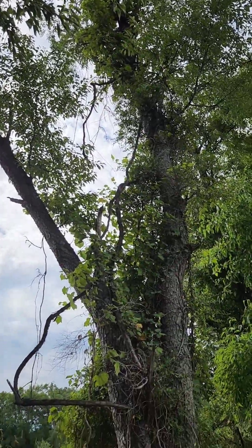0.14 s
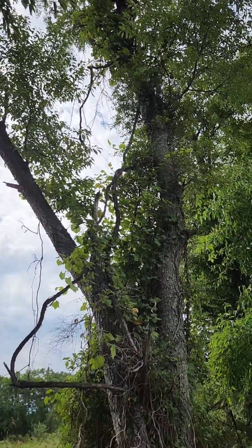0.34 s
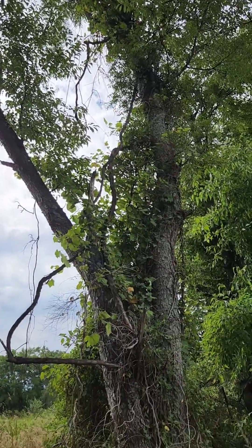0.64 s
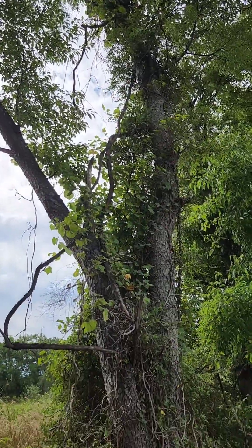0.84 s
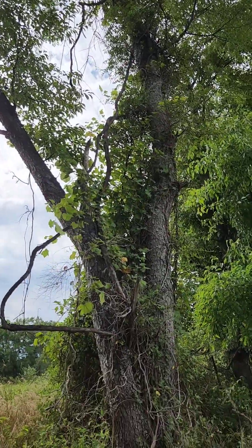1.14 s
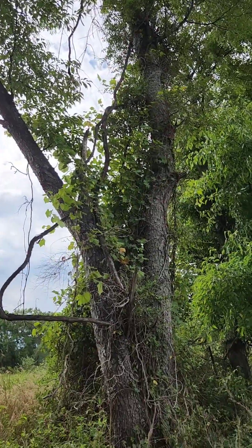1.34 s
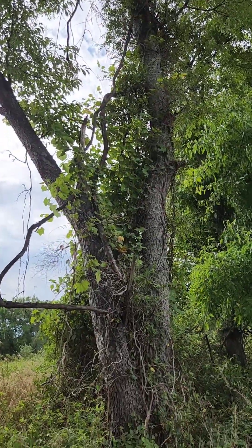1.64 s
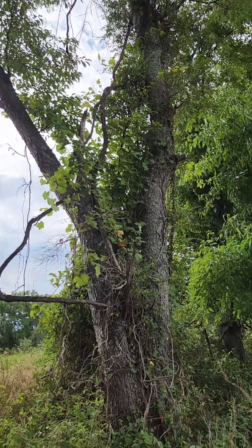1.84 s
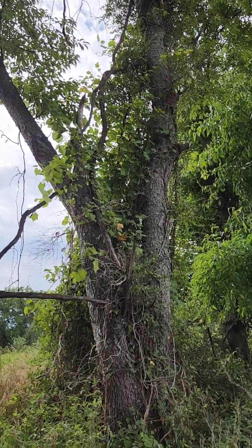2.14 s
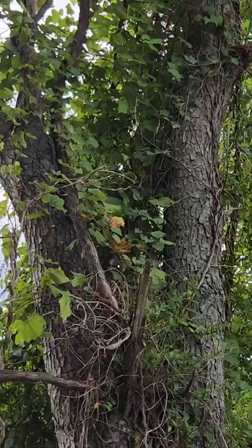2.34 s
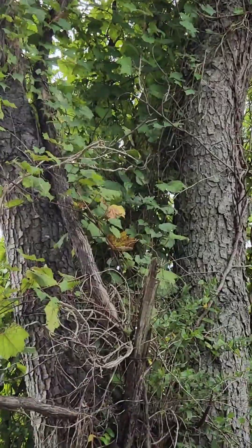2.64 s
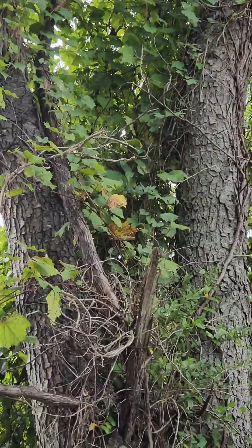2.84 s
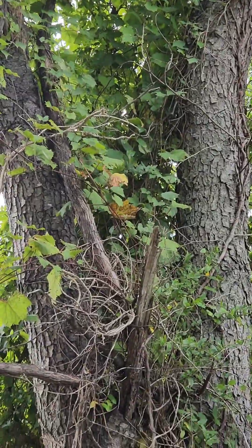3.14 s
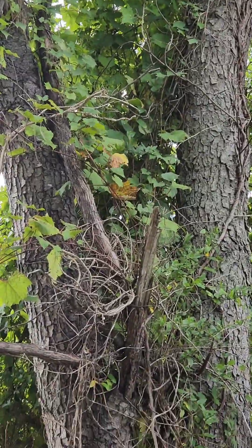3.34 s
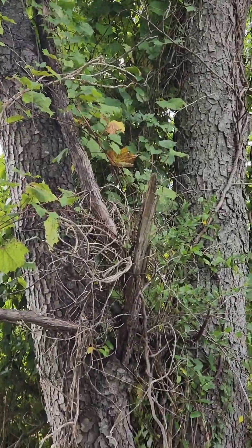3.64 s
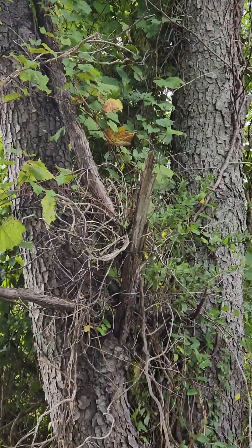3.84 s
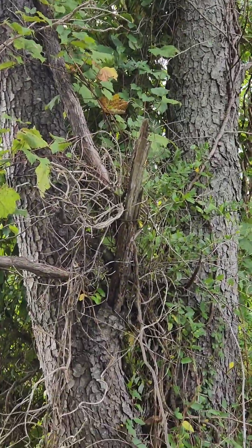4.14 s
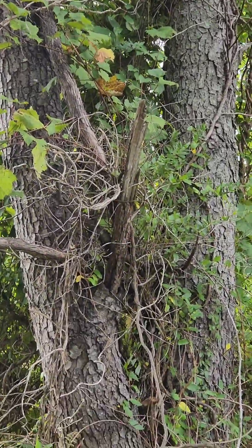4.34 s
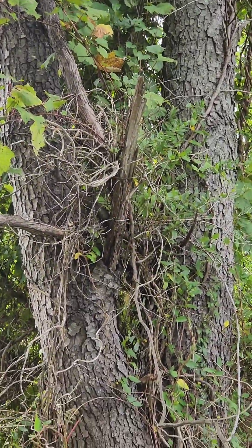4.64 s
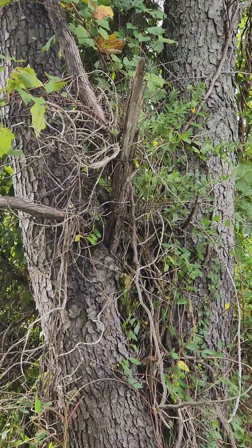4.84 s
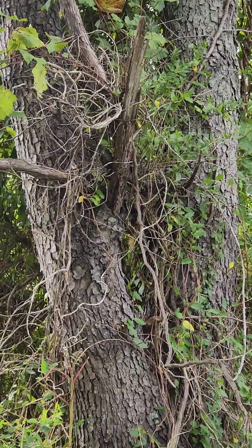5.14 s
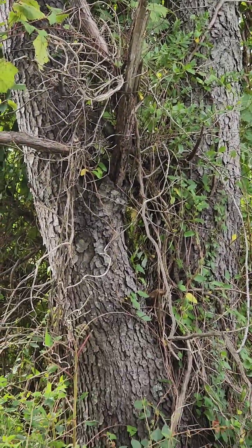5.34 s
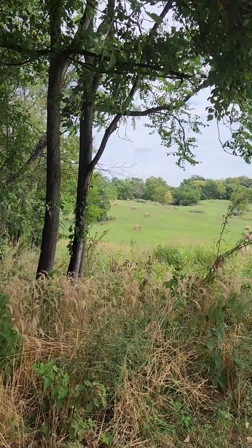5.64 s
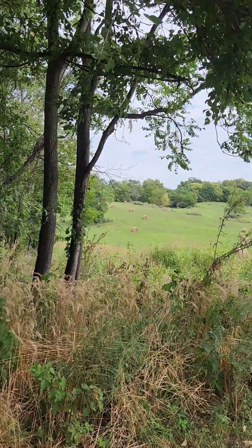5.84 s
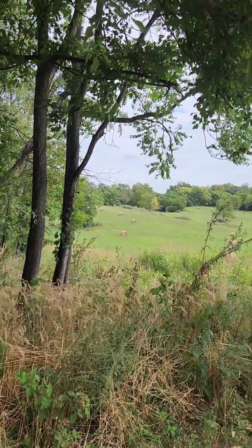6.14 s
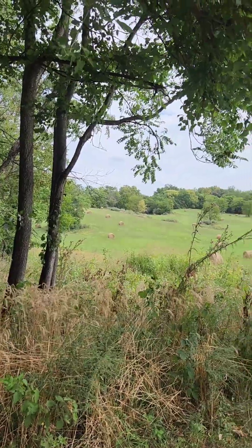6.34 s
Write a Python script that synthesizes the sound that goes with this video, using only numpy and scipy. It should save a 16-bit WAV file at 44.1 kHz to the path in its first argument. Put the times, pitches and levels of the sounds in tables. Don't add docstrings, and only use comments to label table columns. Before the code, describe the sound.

Summer field edge: continuous high insect trilling, soft triple chirps growing nearer, wind thumping the microphone, a short dead gap, then a close pulsing cricket.

```python
import sys
import numpy as np
from scipy import signal
from scipy.fft import rfft, irfft, next_fast_len
from scipy.io import wavfile
from scipy.ndimage import map_coordinates

SR = 44100
rng = np.random.default_rng(int(sys.argv[2]) if len(sys.argv) > 2 else 0)


def log_audio(samples):
    frames = np.atleast_2d(samples).T
    limited = np.clip(frames, -1, 1)
    pcm = np.round(limited * 32767).astype(np.int16)
    wavfile.write(sys.argv[1], SR, pcm)


def nominal_scale(level):
    x = np.asarray(level, float) / 20
    return 10 ** x


N = 286650
STOP_S = 5.3825


def in_time(parts):
    t = np.arange(N) / SR
    first_end, second_start = parts[0][-1][0], parts[1][0][0]
    held = np.where(t < STOP_S, np.minimum(t, first_end), np.maximum(t, second_start))
    s, *columns = np.transpose([row for part in parts for row in part])
    return [np.interp(held, s, c) for c in columns]


def swells(rows, width_s):
    coarse = np.arange(0, N + 64, 64)
    s, *columns = np.transpose(rows)
    bells = np.exp(-((coarse / SR - s[:, None]) / width_s) ** 2)
    return [np.interp(np.arange(N), coarse, c @ bells) for c in columns]


def at_hz(points, hz):
    points = np.array(points)
    return np.interp(np.log(hz), np.log(points[:, 0]), points[:, 1])


def rms_one(x):
    return x / np.sqrt(np.mean(x ** 2) + 1e-20)


def pan(db):
    return nominal_scale(np.array([db / 2, -db / 2]))


def drift(rate):
    r = np.exp(-80 * np.pi * rate / SR)
    draws = rng.standard_normal(N // 40 + 2002)
    slow = signal.lfilter([1], [1, -2 * r, r * r], draws)[2000:]
    return np.interp(np.arange(N) / 40, np.arange(len(slow)), rms_one(slow))


def noise(colour, patchy_db, rate, count):
    # (frequency [Hz], likeness [-1 to 1])
    likeness = [(60, .7), (150, .5), (300, .85), (700, .8), (1400, .68), (2600, .3), (4400, -.2), (6000, 0)]
    size = next_fast_len(N)
    hz = np.maximum(np.fft.rfftfreq(size, 1 / SR), 1)
    alike = np.clip(at_hz(likeness, hz), -1, 1)
    mid, side = rfft(rng.standard_normal((2, size))) * nominal_scale(at_hz(colour, hz))
    both = np.sqrt(1 + alike) * mid + np.sqrt(1 - alike) * side * [[1], [-1]]
    place = np.interp(np.log(hz), np.log([colour[0][0], colour[-1][0]]), [-1, count])
    out, together = 0, drift(rate)
    for k in range(count):
        band = irfft(both * np.maximum(1 - abs(place - k), 0), size)[:, :N]
        flicker_db = patchy_db * (0.63 * together + 0.61 * drift(rate))
        out = out + band * nominal_scale(flicker_db)
    return rms_one(out)


def across_ports(x):
    # (time [s], left port hears later by [ms])
    facing = [
        [(0, .18), (.7, .14), (2.2, .1), (2.6, 0), (5.37, -.02)],
        [(5.6, -.07), (6.5, -.14)],
    ]
    late = in_time(facing)[0] * SR / 1000
    left = map_coordinates(x[0], [np.arange(N) - late], order=3, mode="nearest")
    return np.array([left, x[1]])


def add_stroke(out, s, db, hz, pan_db, length_s, rise_hz, fall_hz, third_db, paths):
    u = np.arange(int(length_s * SR)) / (length_s * SR)
    pitch_hz = hz - rise_hz * (1 - u) ** 3 - fall_hz * u ** 2.56
    phase = 2 * np.pi * np.cumsum(pitch_hz) / SR
    phase = phase + 2 * np.pi * paths[:, None]
    tone = np.sin(phase) + nominal_scale(third_db) * np.sin(3 * phase)
    stroke = np.sin(np.pi * u) ** .7 * tone
    i = int(np.clip(round(s * SR), 0, N))
    out[:, i:i + len(u)] += (nominal_scale(db) * pan(pan_db)[:, None] * stroke)[:, :N - i]


def trill(out, start, end, hz, rate, db, pan_db, wobble_db):
    times = np.arange(start, min(end, N / SR), 1 / rate)
    length_s = min(0.72 / rate, .022)
    lag = rng.random()
    for s, (late, loud, start_phase, sway) in zip(times, rng.standard_normal((400, 4))):
        paths = start_phase + np.array([0, lag + 0.24 * sway])
        add_stroke(out, s + .0012 * abs(late), db + wobble_db * loud, hz, pan_db, length_s, 150, 150, -80, paths)


def ground_crickets():
    # (time [s], level [dB], left over right [dB])
    chorus = [
        [(0, -31.5, -5.5), (.52, -34, -4), (1.85, -32, -6), (1.99, -35, -8), (2.5, -31, -6), (3.56, -32, -6.5),
         (3.9, -31.5, -7), (5.37, -32.5, -7)],
        [(5.6, -32, -5.5), (6.5, -34, -7.5)],
    ]
    # (frequency [Hz], level [dB per Hz])
    chorus_colour = [(5500, -45), (6300, -35.5), (6800, -18), (7100, -13.5), (7300, -4), (7750, -6.5),
                     (8050, -9), (8300, -20.5), (8750, -13.5), (8950, -21), (9200, -59)]
    # (frequency [Hz], level [dB per Hz])
    octave_colour = [(13900, -19), (14350, 1.5), (14600, 1.5), (15000, -5.5), (15700, -7.5), (16200, -23)]
    # (from [s], to [s], wing pitch [Hz], strokes per second [Hz], peak [dB], left over right [dB])
    singers = [
        (0, 2.7, 8780, 31.1, -57, 0),
        (2.7, 5.4, 8800, 18.4, -57, 1),
        (0, 5.4, 8410, 28.3, -49, -1),
        (0, 5.4, 7800, 47.2, -35, -9),
        (0, 5.4, 7560, 44.5, -39, -7),
        (0, 5.4, 7410, 13.4, -35, -5),
        (2.0, 5.4, 8020, 28.4, -38, -6),
        (0, 5.4, 7280, 41.0, -39, -5),
        (5.5, 6.5, 8100, 30.8, -40, -8),
        (5.65, 6.5, 4760, 52.0, -56, -2),
    ]
    # (time [s], peak [dB])
    close = [(5.6214, -23), (5.6981, -21), (5.7715, -20.5), (5.8465, -23), (5.9192, -21), (5.9981, -21),
             (6.0725, -20.5), (6.1456, -23.5), (6.2184, -23.5), (6.2909, -22.5), (6.3726, -24),
             (6.441, -25)]
    level_db, pan_db = in_time(chorus)
    crowd, single = np.zeros((2, N)), np.zeros((2, N))
    for hz in np.linspace(6900, 8500, num=33):
        rate, side, loud = rng.random(3)
        db = at_hz(chorus_colour, hz) + 3 * loud
        trill(crowd, -rate / 9, 7, hz + 40, 13 + 40 * rate, db, 6 * side - 3, 1.3)
    echoes = noise(chorus_colour, patchy_db=0.5, rate=8, count=4)
    blur = nominal_scale(1.23) * rms_one(crowd) + nominal_scale(-2.5) * echoes
    shared = .3
    blur[0] = shared * blur[1] + np.sqrt(1 - shared ** 2) * blur[0]
    for row in singers:
        trill(single, *row, 2.5)
    for s, db in close:
        paths = rng.random() + np.array([0, .1])
        add_stroke(single, s - .003, db - 3.0, 7560, -11, .021, 300, 120, -80, paths)
    overtone = noise(octave_colour, patchy_db=5.0, rate=8, count=2)
    octave = nominal_scale(level_db - 28.5) * pan(-1.5)[:, None] * overtone
    return octave + nominal_scale(level_db - 3.0) * pan(pan_db) * across_ports(blur) + single


def field_crickets():
    # (wing pitch [Hz], opening stroke lower by [Hz], stroke gap [s], swell per stroke [dB], droop [Hz])
    wings = [
        (4440, 220, .042, 4.5, 370),
        (4450, 17, .046, 1.5, 555),
        (4660, 51, 0.037, 1.5, 280),
    ]
    # (time of last stroke [s], its peak [dB], strokes [count], left over right [dB])
    near_chirps = [
        [(2.582, -32.5, 3, -3.5), (3.026, -29.5, 2, -3.5), (4.226, -31, 3, -3.5)],
        [(.349, -44, 3, -12), (.664, -62, 3, -11), (.998, -54, 3, -6), (1.361, -52.5, 3, -5),
         (1.716, -53.5, 3, -6), (2.054, -51, 3, -3), (2.398, -47, 3, -4), (2.748, -46.5, 3, -2),
         (3.224, -46, 3, -4.5), (3.546, -44, 3, -5), (3.976, -42, 3, -3), (4.314, -41, 2, -6),
         (4.675, -40.5, 3, -2), (5.013, -33.5, 3, -1), (5.452, -33, 3, 0.5)],
        [(.185, -55, 3, 5), (1.22, -65, 2, -4), (2.985, -43, 3, -2), (3.309, -45, 2, 5), (3.776, -45, 3, -5),
         (4.094, -44.5, 3, -4), (4.477, -46, 3, -7), (4.841, -42, 3, -1), (5.191, -44, 3, -2.5)],
    ]
    # (delay [s], level [dB])
    tree_echoes = [
        (.006, -16),
        (.013, -20),
        (.022, -26),
        (.037, -23),
    ]
    # (time [s], level [dB])
    far_chirps = [
        [(0, -64), (.2, -60), (2.0, -61.5), (2.4, -56), (5.37, -60.5)],
        [(5.6, -63), (6.5, -61.5)],
    ]
    # (time [s], swell [dB])
    far_swells = [(.17, 5), (.95, 4), (1.3, 5), (1.67, 6), (1.93, 3), (2.7, 5), (3.02, 0), (3.31, 4),
                  (3.53, 4), (3.98, 0), (4.22, 8), (4.48, 6), (4.76, 7), (5.01, 6.5), (5.18, 5),
                  (5.37, 4.5), (5.71, 6), (5.97, 7), (6.24, 3), (6.49, 4)]
    # (frequency [Hz], level [dB per Hz])
    far_colour = [(3900, -25), (4150, -10), (4440, -1), (4580, -4), (4710, -2), (4850, -13), (5050, -25)]
    uneven_db, uneven_hz, sway_db = 1, 36, 2.5
    near = np.zeros((2, N))
    for (wing_hz, opening_hz, gap_s, swell_db, droop_hz), chirps in zip(wings, near_chirps):
        for last_s, last_db, strokes, side in chirps:
            strokes = round(strokes)
            for early, (loud, sharp, sway, phase) in zip(range(strokes), rng.standard_normal((3, 4))):
                weak = (early / (strokes - 1)) ** 2
                hz = wing_hz - opening_hz * weak + uneven_hz * sharp
                droop = droop_hz * np.clip((hz - 4200) / 170, 0, 1)
                s = last_s - gap_s * early - .001
                db = last_db - 2 * swell_db * np.sqrt(weak) + 2.5 + uneven_db * loud
                paths = phase + np.array([0, .27])
                add_stroke(near, s, db, hz, side + sway_db * sway, .023, 120, droop, -19, paths)
    echo = sum(nominal_scale(db) * np.roll(near[::-1], round(s * SR), axis=1) for s, db in tree_echoes)
    far = noise(far_colour, patchy_db=0.5, rate=41, count=3)
    far_db = in_time(far_chirps)[0] + swells(far_swells, width_s=0.098)[0]
    return near + echo + nominal_scale(far_db + 0.66) * pan(-1.5)[:, None] * far


def wind():
    # (time [s], level [dB], left over right [dB])
    breeze = [
        [(0, -45.5, -3), (1.38, -45, -1), (1.55, -34, 9), (1.7, -35, 21.5), (1.76, -46.5, -6),
         (2.11, -43.5, -1), (2.17, -34.5, 13.5), (2.66, -34, 3.5), (2.84, -36.5, -1.5), (3.45, -32.5, 4.5),
         (3.85, -37, 2), (4.3, -33, 2.5), (4.64, -41, -2.5), (5.37, -35.5, -1.5)],
        [(5.6, -42, 3), (5.95, -37, 5), (6.15, -39.5, -5), (6.5, -42, 1)],
    ]
    # (time [s], swell [dB], toward the left port [dB], deep throb [dB])
    buffets = [(.21, 11, 14, -23), (.97, 2.5, 2, 9.5), (1.68, 4, -8, -44), (2.19, 3.5, -1, -41),
               (2.42, 0.5, 0, 3), (2.63, 3.5, 6, -2), (2.91, 0.5, 18, 3), (3.28, 2, 3, 3.5),
               (3.53, 2.5, 3, 6), (3.67, 0.5, 10, 5), (3.8, 6, -3, 6.5), (3.96, 0.5, -4, -2),
               (4.01, -1.5, 0, 5), (4.14, -4.5, -7, -1), (4.2, 2, -0.5, 11.5), (4.42, -4.5, -0.5, 17.5),
               (4.87, 3, 3, 10), (5.02, 9, -3, -7.5), (5.99, -4.5, 6, 12), (6.16, -3, 8, 17),
               (6.49, 5.5, 1, 4)]
    # (frequency [Hz], level [dB per Hz])
    wind_colour = [(12, -28), (20, -6), (48, -1.5), (77, 2.5), (96, -2), (193, -12.5), (315, -24.5),
                   (400, -25.5), (520, -63.5), (880, -120)]
    level_db, pan_db = in_time(breeze)
    swell_db, left_db, deep_db = swells(buffets, width_s=0.045)
    gusts = noise(wind_colour, patchy_db=3.5, rate=20, count=5)
    deep = signal.sosfiltfilt(signal.butter(2, 58, fs=SR, output="sos"), gusts)
    throbbing = gusts + (nominal_scale(1 + deep_db) - 1) * deep
    return nominal_scale(level_db + swell_db) * pan(pan_db + left_db) * throbbing


def road():
    # (time [s], level [dB])
    traffic = [
        [(0, -50), (2.03, -49.5), (2.15, -47.5), (3.25, -45), (3.55, -46), (4.5, -46), (5.37, -46)],
        [(5.6, -51.5), (6.5, -50.5)],
    ]
    # (frequency [Hz], level [dB per Hz])
    road_colour = [(150, 0.5), (300, -3), (460, -5), (700, -2), (960, -1.5), (1200, -6.5), (1450, -11),
                   (2000, -11.5), (2800, -24), (4000, -22.5), (5500, -38.5)]
    # (frequency [Hz], width [Hz], level [dB])
    tyre_hums = [
        (951, 65, -15.5),
        (1462, 160, -13.5),
    ]
    level_db, = in_time(traffic)
    resumed = np.arange(N) > STOP_S * SR
    bright_db = 1.03 * (level_db + 45.5) + 3 * resumed
    drone = noise(road_colour, patchy_db=.6, rate=6, count=7)
    low = signal.sosfilt(signal.butter(2, 1500, fs=SR, output="sos"), drone)
    hums = 0
    for hz, width_hz, db in tyre_hums:
        hum = rms_one(signal.lfilter(*signal.iirpeak(hz, hz / width_hz, fs=SR), drone))
        hums = hums + nominal_scale(db + 3.6 * drift(5.5)) * hum
    return across_ports(nominal_scale(level_db + 2.5) * (low + nominal_scale(bright_db) * (drone - low + hums)))


def katydids():
    # (time [s], level [dB], left over right [dB])
    hiss_level = [
        [(0, -54.5, -8), (1.4, -54.5, -6), (2.03, -56.5, -2), (2.3, -56.5, -6), (3.2, -58, -6.5),
         (4.3, -57, -9), (4.71, -57.5, -5), (5.37, -54.5, -5.5)],
        [(5.6, -48.5, -8), (6.5, -48.5, -8)],
    ]
    # (frequency [Hz], level [dB per Hz])
    hiss_colour = [(1700, -25), (2500, -9), (6200, -8), (9200, -17), (10300, -10), (11800, -3.5),
                   (14250, -3), (15700, -.5), (40000, -2)]
    level_db, pan_db = in_time(hiss_level)
    hiss = noise(hiss_colour, patchy_db=.8, rate=12, count=5)
    highs = signal.sosfiltfilt(signal.butter(2, 7500, "high", fs=SR, output="sos"), hiss)
    return nominal_scale(level_db + 3.5) * (hiss - highs + pan(pan_db) * highs)


def bird():
    # (time [s], length [s], from [Hz], to [Hz], level [dB])
    chips = [
        (.434, .022, 2700, 4800, -52.5),
        (.04, .07, 3400, 3050, -64),
        (.13, .08, 3150, 2750, -65),
        (1.0, .07, 3700, 3400, -65),
    ]
    out = np.zeros((2, N))
    for s, length_s, from_hz, to_hz, db in chips:
        add_stroke(out, s, db, to_hz, -2.5, length_s, to_hz - from_hz, 0, -80, np.zeros(2))
    return out


def scene():
    return ground_crickets() + field_crickets() + wind() + road() + katydids() + bird()


def top_cut(x):
    return signal.sosfilt(signal.butter(12, 15790, fs=SR, output="sos"), x)


def record(dry):
    # (frequency [Hz], level [dB])
    port_tilt = [(7900, 0), (8400, 3), (9200, 2), (11300, -6), (13000, -1), (14300, 5), (16000, 7)]
    top_hz = 15790
    resume_s, fade_out_s, fade_in_s = 5.566, .003, 0.02
    hz = np.maximum(np.fft.rfftfreq(N, 1 / SR), 1)
    ports = irfft(rfft(dry) * pan(at_hz(port_tilt, hz)) * (hz < top_hz), N)
    t = np.arange(N) / SR
    before, after = (STOP_S - t) / fade_out_s, (t - resume_s) / fade_in_s
    gate = np.clip(np.maximum(before, after), 0, 1)
    return top_cut(ports * gate)


dry = scene()
out = record(dry)
log_audio(out)
```